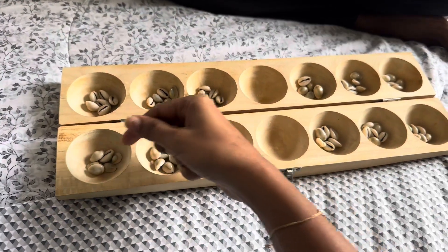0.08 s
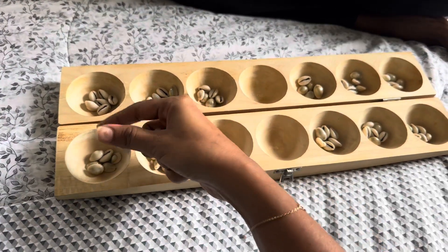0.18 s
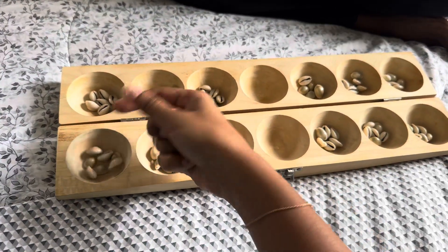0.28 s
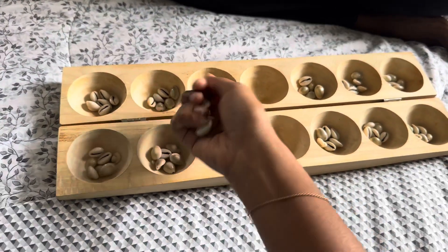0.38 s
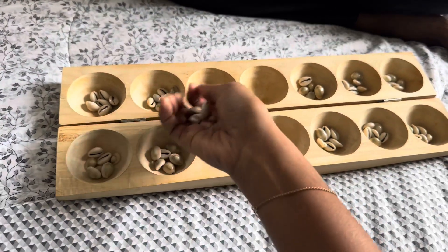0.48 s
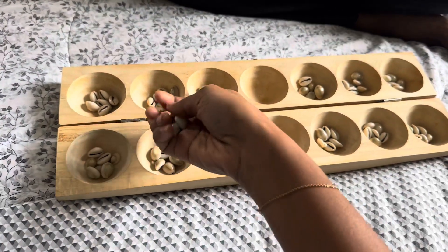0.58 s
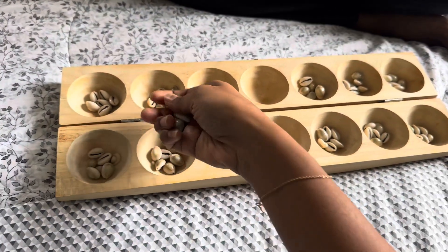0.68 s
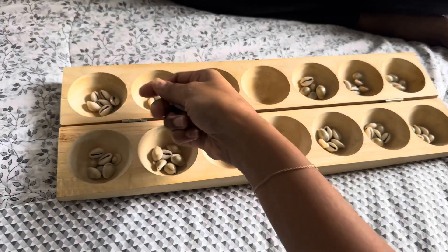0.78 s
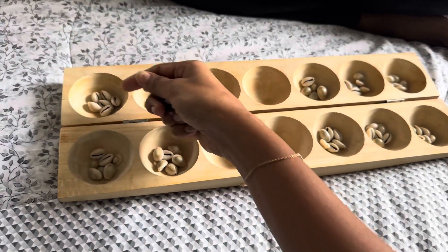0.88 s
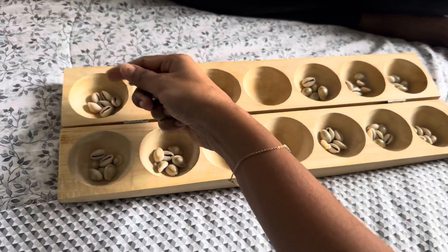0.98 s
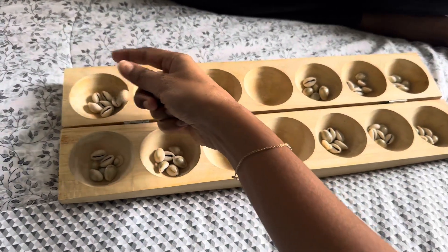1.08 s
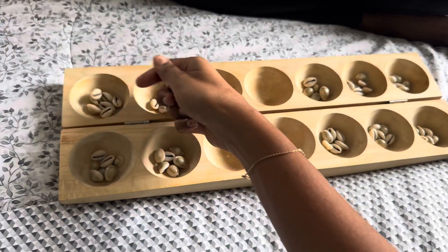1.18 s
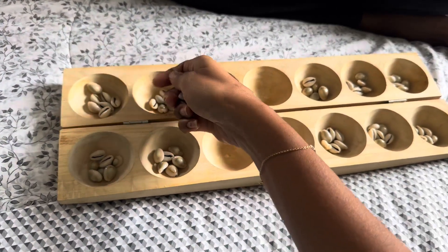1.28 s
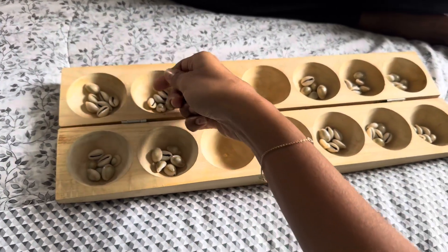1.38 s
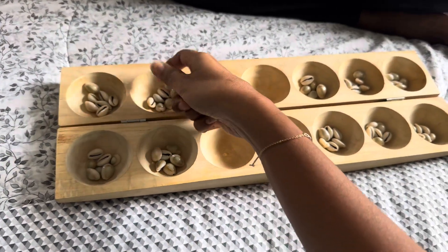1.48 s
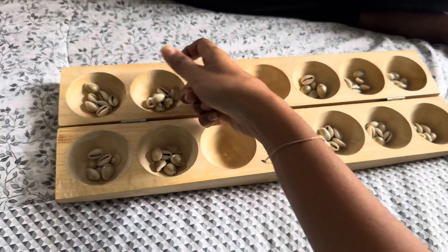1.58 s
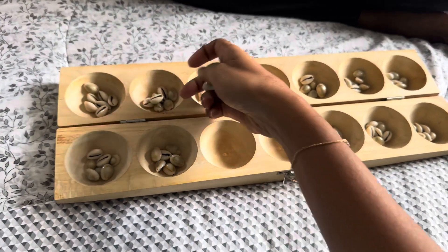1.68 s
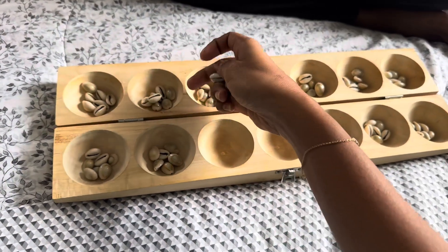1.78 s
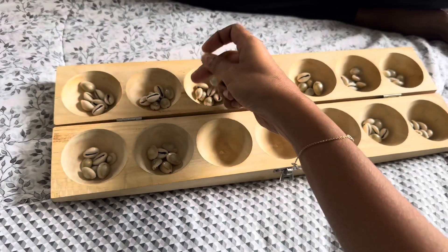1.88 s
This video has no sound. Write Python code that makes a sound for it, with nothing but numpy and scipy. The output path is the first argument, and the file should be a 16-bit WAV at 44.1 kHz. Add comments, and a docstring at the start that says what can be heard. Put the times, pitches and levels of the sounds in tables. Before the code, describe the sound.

Small hard shells click into a wooden game board. After a faint tick, the loudest bright snap lands at 0.25 s with a woody knock and quick rattle. Lighter ticks follow, with a crisp click near 0.56 s and a small one at 0.8 s. A dull knock at 1.1 s leads to a click and patter at 1.17 s; a clustered drop comes at 1.57 s. Close stereo, small room, faint low hum.

```python
"""Small hard shells click together in a hand and drop into the pits of a wooden game board lying on a bed.
Each contact is a bright snap and tick of noise plus a short breathy tone, the shell's hollow.
Landings add a dull crack and ringing board modes; a dying patter of faint contacts is the shells jostling.
A low machine hum (bands of noise) and room air lie underneath.
A close two-port microphone hears it in a small room, made of decaying noise."""
import sys
import numpy as np
from scipy import signal
from scipy.fft import rfft, irfft, next_fast_len
from scipy.io import wavfile

SR = 44100
rng = np.random.default_rng(int(sys.argv[2]) if len(sys.argv) > 2 else 0)


def decibels_to_gain(level_db):
    """Convert a level in decibels to a linear amplitude gain (20 dB per decade)."""
    exponent = np.asarray(level_db, float) / 20
    return 10 ** exponent


def to_wav(s):
    """Save 16-bit WAV."""
    ch = np.atleast_2d(s).T  # columns
    pcm = np.round(np.clip(ch, -1, 1) * 32767)  # PCM
    wavfile.write(sys.argv[1], SR, pcm.astype(np.int16))


N = 83790
PRESS_S = 0.0013  # build-up time of a contact


def unit(x):
    """Scale the whole array to unit rms."""
    return x / np.sqrt(np.mean(x ** 2) + 1e-20)


def unit_peak(rows):
    """Scale each row to unit peak."""
    return rows / np.abs(rows).max(axis=-1, keepdims=True)


def along(points, hz):
    """Interpolate (frequency [Hz], value) points on a log-frequency axis."""
    point_hz, value = np.transpose(points)
    return np.interp(np.log(hz + 1), np.log(point_hz + 1), value)


def filtered(x, response):
    """Multiply the spectrum of x by a complex response of frequency."""
    size = next_fast_len(N + SR // 2)
    hz = np.fft.rfftfreq(size, 1 / SR)
    return irfft(rfft(x, size) * response(hz), size)[..., :N]


def place(start_s, rows):
    """Sum one row of samples per event at its start time."""
    at = np.round(start_s * SR).astype(int)[:, None] + np.arange(rows.shape[1])
    return np.bincount(at.ravel(), rows.ravel(), N + SR)[:N]


def pressed(t):
    """Rise from 0 to 1 as a contact builds up."""
    return 1 - np.exp(-(t / PRESS_S) ** 4)


def room_air():
    """Coloured noise whose likeness at the two ports depends on frequency."""
    # noise colour: (frequency [Hz], relative density [dB per Hz])
    colour = [(25, -46.5), (60, -13.5), (124, -30), (212, -17), (400, -23), (620, -21), (1690, -26),
              (2810, -41.5), (5670, -39.5), (11500, -46.5), (14500, -64.5)]
    # left-right likeness: (frequency [Hz], correlation [1])
    alike = [(130, 1), (300, 0.13), (700, 0.47), (1400, 0.067), (8000, 0.22)]
    level_db = -64

    def mid_side(hz):
        angle = np.arccos(np.clip(along(alike, hz), -1, 1)) / 2
        return decibels_to_gain(along(colour, hz)) * [np.cos(angle), np.sin(angle)]

    mid, side = filtered(rng.standard_normal((2, N)), mid_side)
    return decibels_to_gain(level_db) * unit(np.array([mid + side, mid - side]))


def machine_hum():
    """Bands of noise that waver as hum, nearly alike at the two ports."""
    # hum bands: (centre [Hz], width at half amplitude [Hz], rms level ahead of the ports [dB])
    bands = [(72.5, 26, -68), (99.5, 6.4, -61.5), (142.7, 23, -69), (540, 109, -74)]
    own_share = 0.14  # independent noise of each port over the shared noise
    hum = np.zeros((2, N))
    for centre_hz, width_hz, level_db in bands:
        noise = rng.standard_normal(N) + own_share * rng.standard_normal((2, N))
        band = filtered(noise, lambda hz: 1 / (1 + (2 * (hz - centre_hz) / width_hz) ** 2))
        hum += decibels_to_gain(level_db) * unit(band)
    return hum


def room(x):
    """Room answer: a fresh random noise tail for each block of time, decaying at a rate set by frequency."""
    # reverberation: (frequency [Hz], decay time t60 [s])
    decay = [(2500, 0.32), (5000, 0.25), (10000, 0.18), (16000, 0.022)]
    level_db, delay_s = -9.5, 0.007
    step = SR // 16  # samples per block
    count = (N + step - 1) // step
    late = np.pad(x, (round(delay_s * SR), -N % step))
    blocks = late[:count * step].reshape(-1, 1, step)
    noise = rng.standard_normal((count, 2, SR // 2))
    hz, t, z = signal.stft(noise, SR, nperseg=256)
    fade = decibels_to_gain(-60 * t / along(decay, hz)[:, None])
    tail = signal.istft(z * fade, SR, nperseg=256)[1]
    answers = signal.fftconvolve(blocks, tail / np.linalg.norm(tail[0, 0]), axes=2)
    start_s = np.arange(count) * step / SR
    return decibels_to_gain(level_db) * np.array([place(start_s, answers[:, side]) for side in range(2)])


def contacts(start_s, level_db, hollow_hz, hollow_db):
    """Shell meets shell: the wall snaps and ticks, the hollow answers with a short breathy ring."""
    # colour of the shell wall: (frequency [Hz], gain [dB])
    wall = [(3000, -13.5), (7500, -14), (9700, 0.5), (11400, 0.5), (13000, -1.5), (16500, -12)]
    dim_from_hz, dim_db_per_khz = 14000, 1.05  # top-treble cut per kHz, for each dB of lower level
    tick_db, snap_db = 0.5, 7
    tick_width_s, tick_tail_db, tick_t60_s = 0.0004, -5.5, 0.02
    hollow_width_hz, hollow_t60_s = 2000, 0.009  # width at a quarter of the amplitude

    t = np.arange(1024) / SR
    hz = np.fft.rfftfreq(len(t), 1 / SR)
    white = rfft(rng.standard_normal((len(start_s), 2, len(t))))

    khz_above = np.clip(hz - dim_from_hz, 0, None) / 1000
    colour = decibels_to_gain(along(wall, hz) + dim_db_per_khz * level_db[:, None] * khz_above)
    snap = irfft(colour * np.exp(-2j * np.pi * hz * PRESS_S))  # impulse at PRESS_S
    hiss = irfft(white[:, 0] * colour)
    burst = np.exp(-((t - PRESS_S) / tick_width_s) ** 2)
    tail = decibels_to_gain(tick_tail_db - 60 * t / tick_t60_s) * pressed(t)
    tick = decibels_to_gain(snap_db) * unit_peak(snap) + unit(hiss) * (burst + tail)

    offset = 2 * (hz - hollow_hz[:, None]) / hollow_width_hz
    breath = irfft(white[:, 1] / (1 + offset ** 2) ** 2)
    tone = np.sin(2 * np.pi * hollow_hz[:, None] * t)
    hollow = (unit(breath) + tone) * decibels_to_gain(-60 * t / hollow_t60_s) * pressed(t)

    both = decibels_to_gain(tick_db) * unit_peak(tick) + decibels_to_gain(hollow_db[:, None]) * unit_peak(hollow)
    return place(start_s, decibels_to_gain(level_db[:, None]) * both)


def jostle():
    """Shells settling: a dense patter of faint contacts that dies away after each disturbance."""
    # disturbances: (start [s], base level of the contacts at the start [dB], decay time t60 [s])
    disturbances = [(0.059, -48, 0.26), (0.254, -35.5, 0.5), (0.386, -43, 0.34), (0.562, -58, 1),
                    (0.798, -57, 0.38), (1.171, -42, 0.33), (1.57, -36.5, 0.3)]
    rate_per_s, scatter_db = 450, 3  # scatter: mean of an exponential draw, added
    mean_hollow_hz, mean_hollow_db = 4600, -4.5
    chance = rng.random((900, 4))
    gap_s = -np.log(1 - chance[:, 0]) / rate_per_s
    s = np.clip(np.cumsum(gap_s), 0, N / SR)
    start_s, start_db, t60_s = np.transpose(disturbances)[..., None]
    decaying_db = np.where(s > start_s, start_db - 60 * (s - start_s) / t60_s, -150)
    level_db = decaying_db.max(axis=0) - scatter_db * np.log(1 - chance[:, 1])
    hollow_hz = mean_hollow_hz * (1 + 0.5 * (chance[:, 2] - 0.5))
    hollow_db = mean_hollow_db + 8 * (chance[:, 3] - 0.5)
    return contacts(s, level_db, hollow_hz, hollow_db)


def board_rings(modes, t, spot_hz):
    """Ring every mode once per blow, scattered in strength, strongest near the pitch the spot favours."""
    scatter_db, spot_db = 2, 12.5  # spot_db: loss of modes far from the favoured pitch
    hz, mode_db, t60_s = np.transpose(modes)[..., None]
    chance = rng.standard_normal((len(spot_hz), len(modes), 1))
    octaves = np.log2(hz / spot_hz[:, None, None])
    level_db = mode_db - spot_db * np.tanh((2 * octaves) ** 2) + scatter_db * chance
    return np.sum(decibels_to_gain(level_db - 60 * t / t60_s) * np.sin(2 * np.pi * hz * t), axis=1)


def knocks():
    """A shell lands in a pit: a short dull crack of noise and the board's modes."""
    # landings: (time [s], overall level [dB], gain of the board ring [dB], favoured pitch at the spot [Hz])
    landings = [(0.249, -20.5, -5.5, 1170), (0.559, -49, -20, 1500), (1.095, -30, 5.5, 2180),
                (1.1076, -53.5, 18, 3130), (1.169, -32, 0.5, 1000), (1.2653, -44.5, 9.5, 1650),
                (1.5697, -28.5, 4, 2100), (1.611, -45, 8.5, 1260), (1.642, -45.5, 9.5, 1700)]
    # board modes: (frequency [Hz], relative level [dB], decay time t60 [s])
    board = [(210, -13, .035), (430, -10, .03), (970, -8, .02), (1155, -8, .06), (1475, -7, .02),
             (1690, -8, .04), (2075, 0, .026), (2980, -12, .025)]
    crack_t60_s, crack_gain = 0.009, 2
    start_s, level_db, ring_db, spot_hz = np.transpose(landings)
    t = np.arange(SR // 8) / SR
    band = signal.butter(3, [350, 4200], "band", fs=SR, output="sos")
    dull = signal.sosfilt(band, rng.standard_normal((len(start_s), len(t))))
    crack = decibels_to_gain(-60 * t / crack_t60_s) * crack_gain * unit(dull)
    ring = decibels_to_gain(ring_db[:, None]) * board_rings(board, t, spot_hz)
    return place(start_s, decibels_to_gain(level_db[:, None]) * (ring + crack) * pressed(t))


def clicks():
    """Distinct shell contacts, each with its own time, level and hollow pitch."""
    # contacts: (time [s], overall level [dB], hollow pitch [Hz], hollow level ahead of hollow_gain_db [dB])
    events = [(0.0569, -37.5, 4916, -8.5), (0.2477, -3.5, 4177, -22), (0.26, -25.5, 4600, -30),
              (0.3299, -24, 4800, -15), (0.3745, -41, 4700, -13), (0.4, -35, 4500, -18),
              (0.4158, -42.5, 4370, -8.5), (0.428, -31.5, 4300, -16.5), (0.5717, -26, 5380, -21),
              (0.6376, -38.5, 5310, -50), (0.7365, -39.5, 4250, -27), (0.8018, -27, 4070, -31),
              (0.8166, -38, 4680, -19.5), (1.179, -35, 4410, -8), (1.1801, -25, 4834, -16),
              (1.1829, -27.5, 5100, -9), (1.198, -32.5, 4950, -21), (1.2067, -34, 4800, -20),
              (1.215, -35.5, 4590, -24), (1.234, -35.5, 4817, -15.5), (1.2447, -35, 4290, -16.5),
              (1.2596, -37.5, 4635, -13), (1.2884, -36.5, 5100, -16), (1.3159, -44.5, 3905, -34),
              (1.5695, -14.5, 3490, -18), (1.583, -21.5, 3440, -12.5), (1.5973, -40.5, 5500, -7.5),
              (1.613, -36, 5150, -2.5), (1.6249, -31, 4610, -17.5), (1.643, -24.5, 5000, -18.5),
              (1.6592, -30, 5690, -16.5), (0.5201, -24, 5600, -26), (0.5583, -15.5, 5100, -25.5),
              (0.5631, -26.5, 5240, -16), (1.1689, -15.5, 4286, -18), (1.3090, -56, 4090, 11.5),
              (1.3790, -66, 3765, 7)]
    hollow_gain_db = 10.5
    start_s, level_db, hollow_hz, hollow_db = np.transpose(events)
    return contacts(start_s, level_db, hollow_hz, hollow_db + hollow_gain_db)


def scene():
    """Sum the shells, their room answer and the background."""
    shells = clicks() + knocks() + jostle()
    return shells + room(shells) + room_air() + machine_hum()


def two_ports(x):
    """Microphone ports that differ in level and phase over frequency."""
    # level difference: (frequency [Hz], left over right [dB])
    difference = [(60, 6.5), (2400, 7), (4400, 11), (6500, 5), (8200, .4), (15000, .1)]
    # phase difference: (frequency [Hz], left ahead of right [rad])
    lead = [(100, .05), (300, 1.1), (800, 2.0), (2400, 2.8), (4500, 4.6), (8000, 6.0), (16000, 7.6)]
    half = np.array([[0.5], [-0.5]])

    def response(hz):
        level = decibels_to_gain(half * along(difference, hz))
        return level * np.exp(1j * (half - 0.5) * along(lead, hz))  # only the right is delayed

    return filtered(x, response)


def top_cut(x):
    """Nothing passes above the cut-off."""
    return signal.sosfilt(signal.butter(12, 17160, fs=SR, output="sos"), x)


def record(dry):
    """Pick the scene up at the two ports."""
    mix = two_ports(dry)
    return top_cut(mix)


dry = scene()
out = record(dry)
to_wav(out)
```